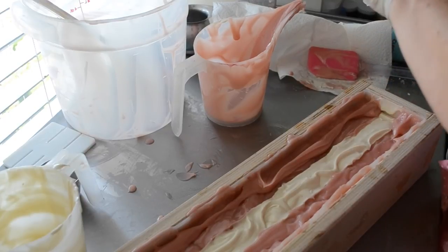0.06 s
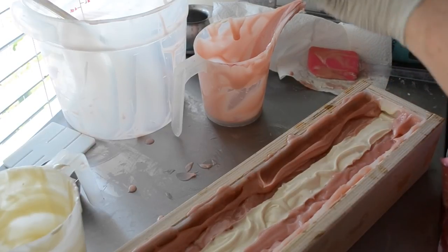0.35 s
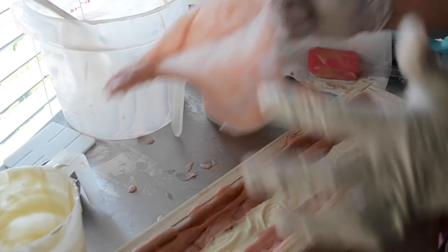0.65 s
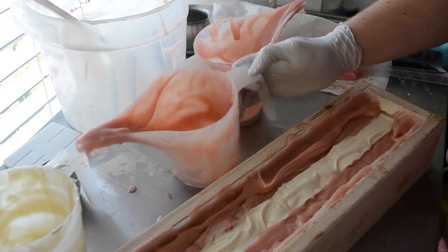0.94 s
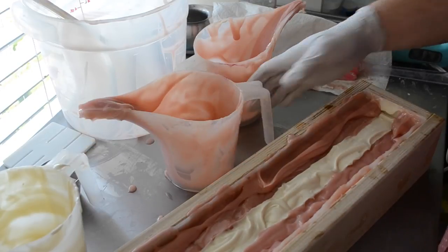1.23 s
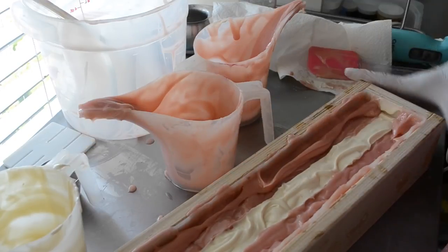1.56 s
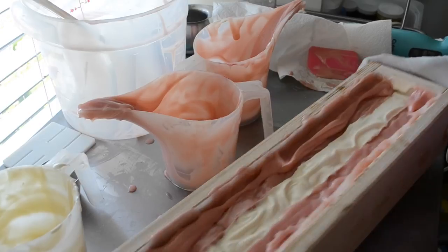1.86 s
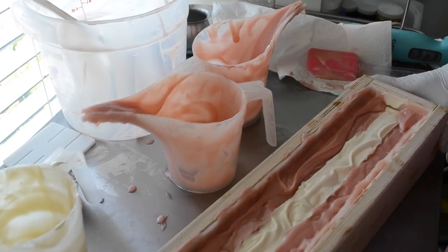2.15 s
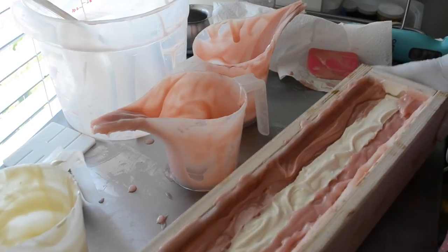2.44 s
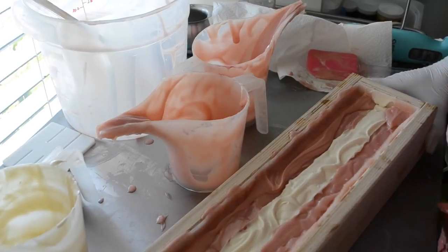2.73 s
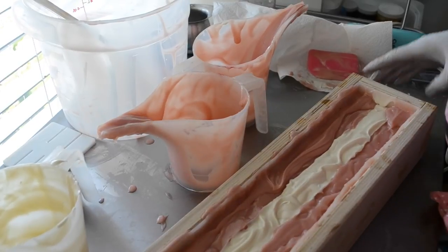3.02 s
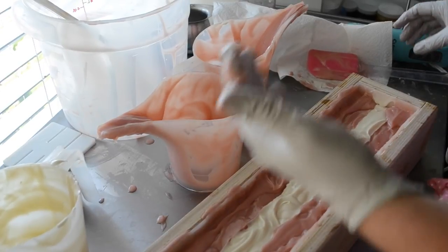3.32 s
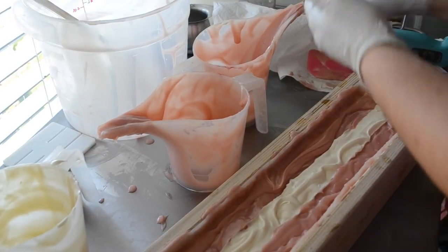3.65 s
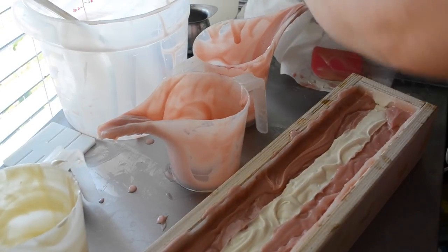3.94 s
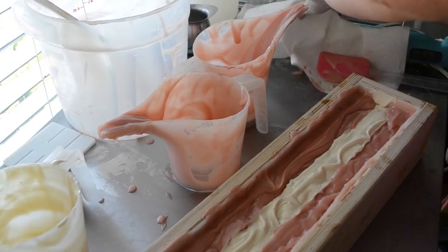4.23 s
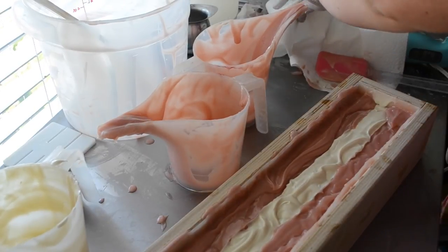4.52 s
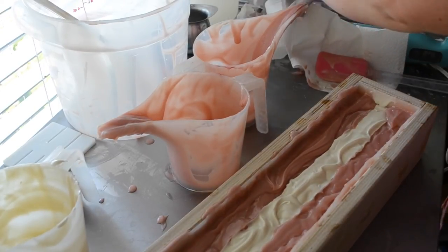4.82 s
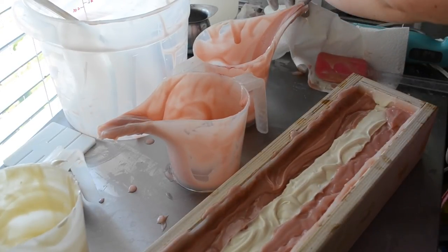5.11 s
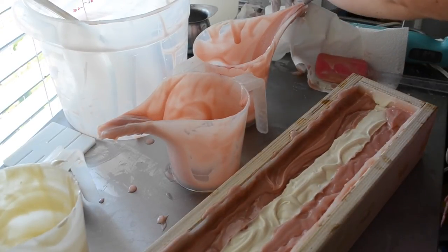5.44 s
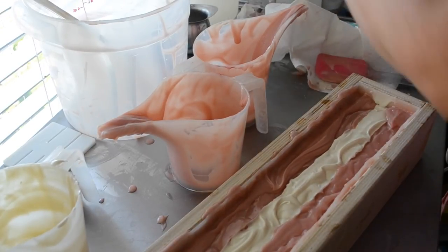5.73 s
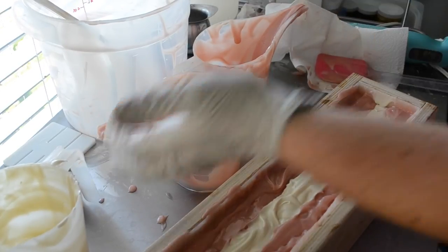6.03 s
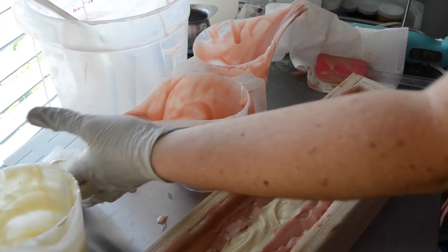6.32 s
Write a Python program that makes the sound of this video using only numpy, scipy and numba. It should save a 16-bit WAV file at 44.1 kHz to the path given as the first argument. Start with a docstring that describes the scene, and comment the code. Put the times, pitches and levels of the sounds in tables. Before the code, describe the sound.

In a quiet workshop, rubber gloves rustle faintly as a plastic pitcher is set down with a few light clacks. A full wooden mould is then banged twice on a steel worktop, making the metal ring and the things on it clatter. A loose object keeps rocking with a quick, fading rattle, and a pitcher is nudged softly at the end. The microphone is close.

```python
"""Soap making at a steel workbench. Over quiet room air, rubber gloves rustle and a plastic pitcher
clacks down, its handle let go. At 2 s and 2.6 s a full wooden mould is banged on the bench: the steel
rings, everything on it clatters, and automatic gain control squashes both bangs. A loose object rocks
between the bangs and again from 2.9 s, quickening slightly as it fades, until it rests at 5.5 s.
The gloves keep rustling, and at 6.4 s another pitcher is nudged."""
import sys
import numpy as np
from scipy import signal
from scipy.fft import rfft, irfft, next_fast_len
from scipy.io import wavfile
from scipy.ndimage import uniform_filter1d
from numba import njit

SR = 44100
rng = np.random.default_rng(int(sys.argv[2]) if len(sys.argv) > 2 else 0)


def int16_out(signal):
    """Quantize to a 16-bit WAV file."""
    q = np.round(np.clip(np.atleast_2d(signal).T, -1, 1) * 32767)
    wavfile.write(sys.argv[1], SR, q.astype(np.int16))


N = 289737
TOP_HZ = 11050
T = np.arange(3 * SR // 2) / SR  # time within one hit [s]


def amp(db):
    """Decibels to gain."""
    return 10 ** (np.asarray(db) / 20)


def unit_rms(x):
    """Scale to rms 1."""
    return x / np.sqrt(np.mean(x ** 2) + 1e-20)


def curve_at(points, hz):
    """Read a (frequency [Hz], value) curve on a log frequency axis."""
    freqs, values = np.transpose(points)
    return np.interp(np.log(hz + 1), np.log(freqs), values)


def decay(t60, t=T):
    """Exponential envelope, 60 dB down after t60 seconds."""
    return np.exp(-np.log(1000) * t / t60)


def add(track, start_s, sound):
    """Mix a sound into the track at its cue."""
    part = track[round(start_s * SR):][:len(sound)]
    part += sound[:len(part)]


def noise(colour, tilt_db=0, size=len(T)):
    """Noise of rms 1, shaped by an EQ curve and tilted by tilt_db per octave."""
    n_fft = next_fast_len(size)
    hz = np.fft.rfftfreq(n_fft, 1 / SR)
    eq = amp(curve_at(colour, hz) + tilt_db * np.log2(hz + 20)) * (hz < TOP_HZ)
    return unit_rms(irfft(rfft(rng.standard_normal(n_fft)) * eq, n_fft)[:size])


def damped(x, t60_curve, stretch=1):
    """Let each frequency of x die away at its own speed."""
    hz, t, bands = signal.stft(x, SR, nperseg=256)
    t60 = stretch * curve_at(t60_curve, hz)[:, None]
    return signal.istft(bands * decay(t60, t), SR, nperseg=256)[1][:len(x)]


def ring(modes, t=T):
    """A struck body: decaying sines, balanced anew for each hit, starting near rms 1."""
    hz, db, t60 = np.transpose(modes)
    gain = amp(db + rng.normal(0, 3.1, len(hz)))
    gain *= np.sqrt(2) / np.linalg.norm(gain)
    phase = rng.uniform(0, 2 * np.pi, len(hz))
    return sum(g * np.sin(2 * np.pi * f * t + p) * decay(d, t)
               for g, f, p, d in zip(gain, hz, phase, t60))


# workshop reverb time: (frequency [Hz], t60 [s])
ROOM_DECAY = [(100, 0.43), (700, 0.5), (2000, 0.42), (10000, 0.14)]
def room(x, wet_db):
    """A dry hit plus the workshop's diffuse tail."""
    build_up = 1 - np.exp(-T[:SR // 2] / 0.0017)
    tail = damped(rng.standard_normal(SR // 2), ROOM_DECAY) * build_up
    return x + amp(wet_db) * signal.fftconvolve(x, tail / np.linalg.norm(tail))[:len(x)]


# EQ of the workshop air: (frequency [Hz], level [dB])
AIR_COLOUR = [(15, -52.5), (25, -13), (54, -4.5), (85, -19.5), (118, -6.5), (187, -13), (327, -7.5),
              (588, -7.5), (685, -9.5), (1140, -9.5), (1260, -10.5), (1710, -14.5), (3770, -16),
              (4180, -22), (11000, -37.5), (14300, -73.5), (22000, -120)]
def room_tone():
    """A quiet bed of air with a thin, fuzzy whine."""
    whine = noise([(3200, -49.5), (3620, -12.5), (3770, 1), (3920, -11), (4300, -48)], size=N)
    return amp(-66) * noise(AIR_COLOUR, size=N) + amp(-80.5) * whine


# EQ of rubbing rubber: (frequency [Hz], level [dB])
RUBBER_COLOUR = [(200, -6.5), (1000, 0.5), (2500, 3.5), (5000, 0), (7500, -4.5), (9500, -1), (11000, -16.5)]
# steady rustle while the hands work: (start [s], end [s], level [dB])
GLOVE_HANDLING = [(.36, 2.8, -71), (3.7, 6.57, -73)]
# single rubs: (peak time [s], level [dB], half length [s], brightness [dB/octave])
GLOVE_STROKES = [(.135, -63, 0.027, -1.5), (0.414, -71, 0.057, 0), (0.649, -62, 0.021, -2.5),
                 (.73, -69.5, .1, 0.5), (0.992, -59.5, 0.076, 1.5), (1.204, -64, .04, -3),
                 (1.376, -65, 0.085, 1.5), (1.506, -60, .04, 3), (1.591, -64, 0.048, 1.5),
                 (1.706, -62.5, 0.046, -0.5), (1.775, -54.5, 0.031, -0.5), (1.889, -66, 0.038, -2),
                 (3.932, -65, 0.19, 1), (4.222, -65, 0.12, 0.5), (4.74, -64, 0.071, 0.5),
                 (5.349, -73, 0.14, 3.5), (5.588, -62, 0.031, 3.5), (5.969, -71, .12, -1)]
# small sticky ticks: (time [s], level [dB], brightness [dB/octave])
GLOVE_TICKS = [(0.133, -60, -4.5), (0.373, -60, 10), (.762, -59, 16), (0.8201, -46.5, 2), (0.8794, -53, 2),
               (1.283, -45.5, -4.5), (4.91, -58, -2), (5.594, -53.5, 5), (5.68, -63, 4), (6.01, -63, 10)]
def gloves():
    """Rubber gloves rub in grainy strokes that swell and fade, and tick where they stick."""
    t = np.arange(N) / SR
    ease_s, grain_db = 0.04, 2.05
    activity = sum(amp(db) * np.clip(np.minimum(t - start, end - t) / ease_s, 0, 1)
                   for start, end, db in GLOVE_HANDLING)
    rub = activity * noise(RUBBER_COLOUR, size=N)
    for peak, db, half_length, tilt_db in GLOVE_STROKES:
        start = max(peak - T[-1] / 2, 0)
        swell = np.exp(-((start + T - peak) / half_length) ** 2)
        add(rub, start, amp(db) * swell * noise(RUBBER_COLOUR, tilt_db))
    grain = unit_rms(uniform_filter1d(rng.standard_normal(N), size=180))
    out = rub * amp(grain_db * grain)
    for cue, db, tilt_db in GLOVE_TICKS:
        tick = noise(RUBBER_COLOUR, tilt_db) * decay(0.034)
        add(out, cue, amp(db) * room(tick, wet_db=-6))
    return out


# EQ of the rocking rim's buzz: (frequency [Hz], level [dB])
RIM_COLOUR = [(59, -47), (100, -24.5), (366, -6.5), (674, -9), (853, 1), (1100, -4.5), (1190, -17.5),
              (1420, -7), (2150, -14), (2780, -12), (3590, -19.5), (9040, -39.5), (11000, -51),
              (14300, -75), (22000, -120)]
# body of the loose object: (frequency [Hz], level [dB], t60 [s])
ROCKER_MODES = [(844, -3, 0.21), (915, 0.5, 0.13), (979, -11, 0.37), (1070, -4, 0.23), (1263, -8, 0.12),
                (1588, -3.5, 0.15), (2360, -1.5, 0.13), (2704, -3.5, 0.2), (4160, -6, 0.089)]
def rocking():
    """A loose object lands twice a swing, ever quicker, softer and duller; the early contacts click."""
    out, t = np.zeros(N), T[:SR // 4]
    first_s, rest_s, die_out_s = 2.9375, 5.49, 0.35
    fall_db_per_s, click_fall_db_per_s, dulling_db_per_s = 8, 10, 1
    swing_s, period_s = first_s, 0.0992
    roll_over = (1 - np.exp(-t / 0.003)) * np.exp(-(t / 0.02) ** 2)  # the rim buzzes only briefly
    while swing_s < rest_s:
        age = swing_s - first_s
        fade_out = np.clip((rest_s - swing_s) / die_out_s, 0, 1)
        for cue, side_db in [(swing_s, 0), (swing_s + 0.44 * period_s, -0.85)]:  # over and back
            buzz = noise(RIM_COLOUR, tilt_db=1.5 - dulling_db_per_s * age, size=len(t))
            click = noise(RUBBER_COLOUR, tilt_db=-3, size=len(t)) * decay(0.051, t)
            click *= amp(1.5 - click_fall_db_per_s * age)
            body = amp(-6) * ring(ROCKER_MODES, t) * (1 - decay(0.028, t))
            contact = (buzz + click) * roll_over + body
            force_db = -44 - fall_db_per_s * age + side_db + rng.normal(0, 1)
            add(out, cue, amp(force_db) * fade_out * room(contact, wet_db=-5.5))
        swing_s += period_s
        period_s *= 0.994
    return out


# pitched contacts: (time [s], level [dB], pitch [Hz], t60 [s])
TAP_NOTES = [(.425, -51, 637, 0.068), (.52, -55, 667, .06), (0.833, -35.5, 847, 0.08),
             (1.896, -54, 2910, 0.048), (1.95, -37, 955, 0.019), (2.14, -27, 341.5, 0.33),
             (2.255, -33.5, 189, 0.26), (2.636, -13, 1150, 0.058), (2.661, -31, 192.7, 0.27),
             (4.488, -54, 424, 0.12), (4.497, -58.5, 187, 0.13), (6.381, -51.5, 4420, 0.032),
             (6.382, -57.5, 3180, 0.025), (6.383, -44.5, 761, 0.067), (6.383, -46, 1270, .04),
             (6.443, -38.5, 863, 0.082)]
def taps():
    """A pitcher wall or a bench panel is caught so that one mode sings out."""
    out = np.zeros(N)
    for cue, db, hz, t60 in TAP_NOTES:
        note = np.sin(2 * np.pi * hz * T) * decay(t60)
        add(out, cue, amp(db) * room(note, wet_db=-14))
    return out


# EQ of a plastic clack: (frequency [Hz], level [dB])
PLASTIC_COLOUR = [(30, -39.5), (130, -20.5), (195, -19.5), (340, 0), (660, -3.5), (950, -3), (1420, -3.5),
                  (2500, -7.5), (3500, -12.5), (5000, -20), (7550, -30.5), (9000, -24.5), (11000, -43.5)]
# pitcher walls: (frequency [Hz], level [dB], t60 [s])
PITCHER_MODES = [(200, -8, 0.49), (259, -2.5, 0.23), (362, -.5, 0.25), (669, -1, 0.19), (810, -7.5, 0.084),
                 (1087, -10, 0.14), (1480, -5.5, 0.14), (2660, -12, 0.13)]
# plastic knocks: (time [s], level [dB], brightness [dB/octave], clack t60 [s], ring mix [dB])
PITCHER_KNOCKS = [(0.831, -36.5, 2.5, 0.055, -15.5), (.8845, -24, 1, 0.22, -3),
                  (.896, -26, -4, 0.086, -3.5), (.916, -32, 3.5, 0.077, 0), (1.216, -27.5, 0.5, 0.13, -33),
                  (1.24, -40, -4, 0.072, -5), (1.9483, -50.5, -5, 0.037, -19.5),
                  (6.3812, -45.5, 2, 0.14, -11), (6.423, -46, -0.5, 0.22, -12.5),
                  (6.4396, -38.5, 0, 0.16, -11)]
def pitchers():
    """Damped plastic is knocked: a short, dense clack over a few wall modes."""
    out = np.zeros(N)
    for cue, db, tilt_db, t60, ring_db in PITCHER_KNOCKS:
        clack = noise(PLASTIC_COLOUR, tilt_db) * decay(t60)
        walls = amp(ring_db) * ring(PITCHER_MODES)
        add(out, cue, amp(db) * room(clack + walls, wet_db=-16))
    return out


# steel top's strongest resonances: (frequency [Hz], level [dB])
BENCH_MODES = [(195, -9.5), (250, -8), (350, -3), (562, -2.5), (610, 1), (745, -1), (849, -3), (937, -2),
               (985, 0.5), (1094, 0), (1222, -5), (1466, 2.5), (1703, -5), (1813, -8), (2242, -1.5),
               (2294, -4), (2567, -2), (2791, -1.5), (3235, -3)]
# its ring time before stretching: (frequency [Hz], t60 [s])
BENCH_DECAY = [(60, 1.1), (300, 0.6), (1000, 0.71), (3000, 0.69), (10000, .6)]
def bench_ring(stretch):
    """The steel top rings; the load on it shortens all its modes alike."""
    return ring([(hz, db, stretch * curve_at(BENCH_DECAY, hz)) for hz, db in BENCH_MODES])


# EQ of struck sheet steel: (frequency [Hz], level [dB])
STEEL_COLOUR = [(24, -65), (40, -33.5), (95, -26.5), (193, -7), (309, -4.5), (348, -2), (382, -0.5),
                (543, -2.5), (703, -1.5), (1070, 0), (1300, -3), (2750, -5), (7920, -21.5), (9550, -17.5),
                (11000, -36), (14300, -65.5), (22000, -120)]
# objects land after each bang; between the bangs, a loose object rocks on the steel:
# (time [s], level [dB], brightness [dB/octave])
BENCH_CONTACTS = [(2.101, -16, 0.5), (2.119, -14.5, 0.5), (2.152, -22.5, 2.5), (2.195, -28.5, 3),
                  (2.26, -24, 1.5), (2.288, -31.5, 2), (2.326, -30, 0.5), (2.352, -34, -2), (2.394, -31, 0),
                  (2.458, -37, 0.5), (2.505, -37, 1), (2.572, -37, -0.5), (2.6169, -31.5, 2),
                  (2.691, -26, 0.5), (2.718, -16.5, -1)]
def clatter():
    """Objects land or rock on the steel and stir its modes; lighter things settle, ever more weakly."""
    out, contacts = np.zeros(N), list(BENCH_CONTACTS)
    delay_s, gap_s, fall_db_per_s = 0.17, 0.045, 44.5  # settling at a stretch of 1
    settle_db, settle_tilt_db = -27, -2
    for bang_s, bang_db, _, stretch in MOULD_BANGS:
        for k, (time_jitter, level_jitter) in enumerate(rng.uniform(-1, 1, size=(10, 2))):
            wait = gap_s * (k + time_jitter / 2)
            db = bang_db + settle_db - fall_db_per_s * wait / stretch + 2 * level_jitter
            contacts.append((bang_s + (delay_s + wait) * stretch, db, settle_tilt_db))
    for cue, db, tilt_db in contacts:
        contact = noise(STEEL_COLOUR, tilt_db) * decay(0.13) + amp(-11.5) * bench_ring(stretch=0.15)
        add(out, cue, amp(db) * room(contact, wet_db=-7))
    return out


# EQ of wood hitting steel: (frequency [Hz], level [dB])
THUD_COLOUR = [(18, -63.5), (30, -34), (114, -25.5), (306, -8.5), (864, -2), (1160, 1.5), (1950, -7),
               (2500, -7), (2760, -6), (3800, -7.5), (7980, -17.5), (9030, -12.5), (11000, -30),
               (14300, -64), (22000, -120)]
# the two main hits: (time [s], level [dB], bench ring mix [dB], decay stretch [ratio])
MOULD_BANGS = [(2.0332, -5, -8.5, 0.94), (2.6338, -7, -6, 0.72)]
def mould():
    """Wood slams on sheet steel: a thud for the attack, the loaded bench's crowded modes for the tail."""
    out = np.zeros(N)
    for cue, db, ring_db, stretch in MOULD_BANGS:
        thud = noise(THUD_COLOUR) * decay(0.096) + amp(-8.5) * bench_ring(stretch=0.16)
        sheet = damped(noise(STEEL_COLOUR), BENCH_DECAY, stretch) + amp(-9.5) * bench_ring(stretch)
        add(out, cue, amp(db) * (thud + amp(ring_db) * sheet))
    return out


def scene():
    """The close mono mix; the hits are high-passed: small objects and thin sheet radiate little bass."""
    low_cut = signal.butter(2, 89.65, "highpass", fs=SR, output="sos")
    hits = signal.sosfilt(low_cut, pitchers() + taps() + mould() + clatter())
    return (hits + rocking() + gloves() + room_tone())[None]


@njit
def gain_control(x, level, ceiling, attack_s, release_s):
    """The gain dives while the level is over the ceiling, then recovers."""
    out, cut = np.empty_like(x), 0.
    for i in range(len(x)):
        excess = max(np.log(level[i] / ceiling + 1e-9), 0.)
        cut += (excess - cut) / (SR * (attack_s if excess > cut else release_s))
        out[i] = x[i] * np.exp(-cut)
    return out


def record(dry):
    """Microphone port notch, gain control, clipping of the first peaks, bass cut and band limit."""
    n_fft = next_fast_len(N + 8192)
    hz = np.fft.rfftfreq(n_fft, 1 / SR)
    port_notch = 1 - 0.5 * np.exp(-((hz - 7900) / 250) ** 2)
    x = irfft(rfft(dry[0], n_fft) * port_notch, n_fft)[:N]
    rms = np.sqrt(np.abs(signal.lfilter(np.ones(128) / 128, 1, x ** 2)))
    x = gain_control(x, rms, ceiling=amp(-12.0), attack_s=0.0071, release_s=0.039)
    x = np.clip(x, -0.52, 0.52)
    bass_cut = 1j * hz / (85 + 1j * hz)
    band_limit = 1 / np.sqrt(1 + (hz / TOP_HZ) ** 220)
    return irfft(rfft(x, n_fft) * bass_cut * band_limit, n_fft)[None, :N]


dry = scene()
out = record(dry)
int16_out(out)
```